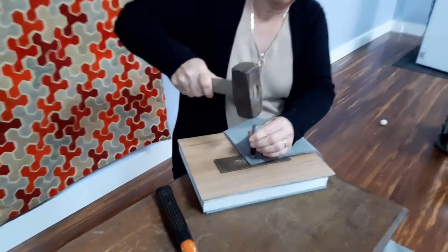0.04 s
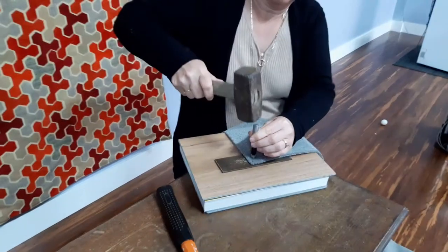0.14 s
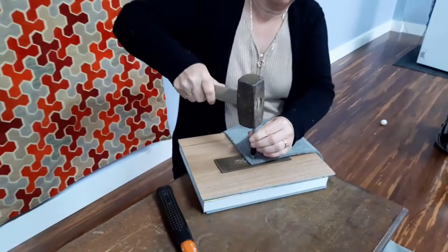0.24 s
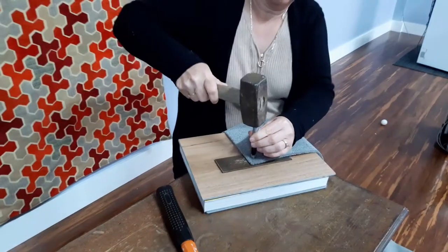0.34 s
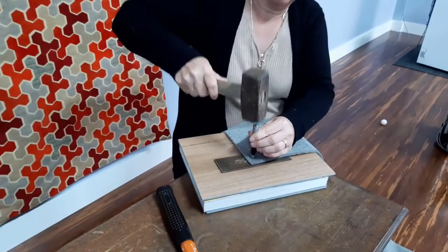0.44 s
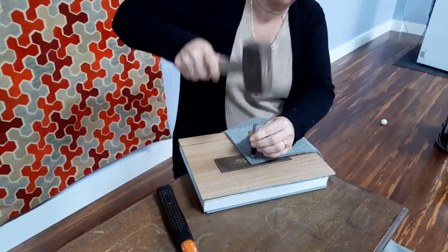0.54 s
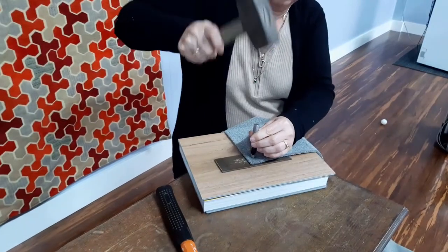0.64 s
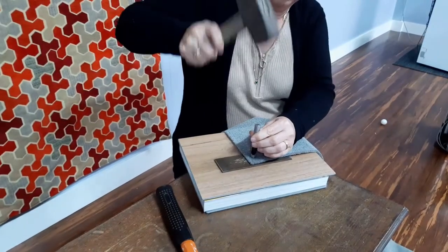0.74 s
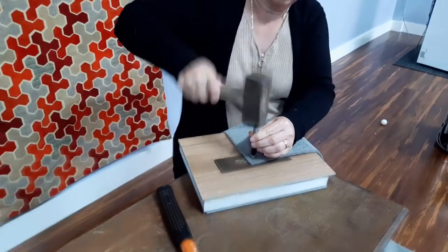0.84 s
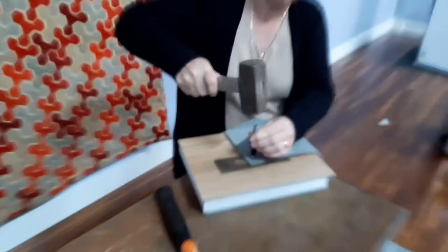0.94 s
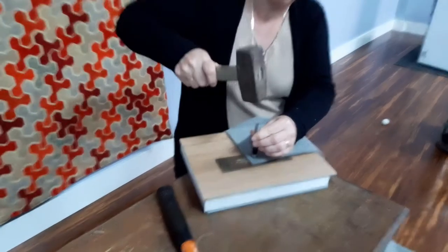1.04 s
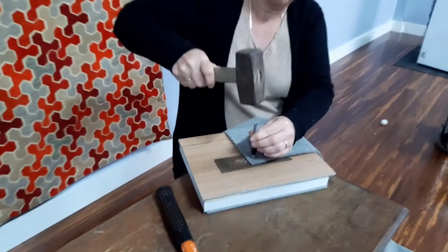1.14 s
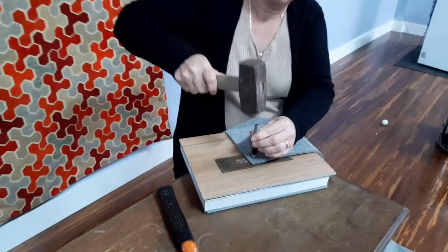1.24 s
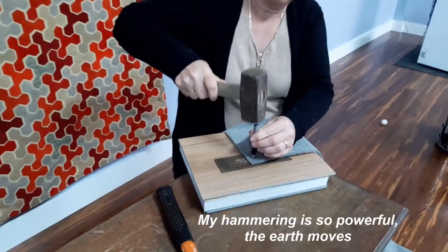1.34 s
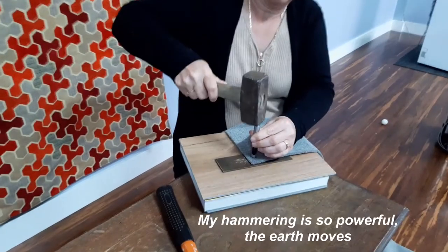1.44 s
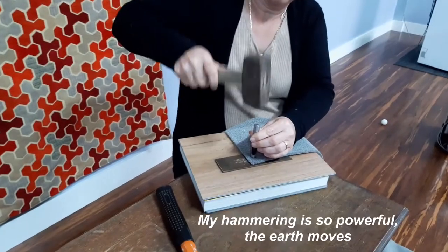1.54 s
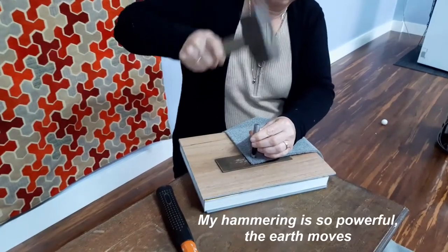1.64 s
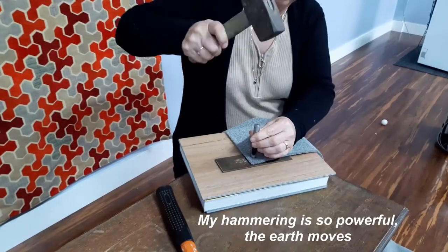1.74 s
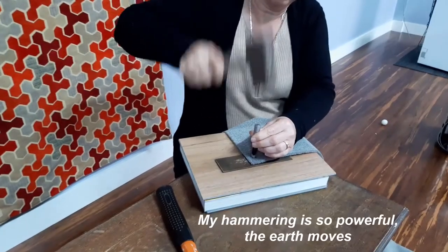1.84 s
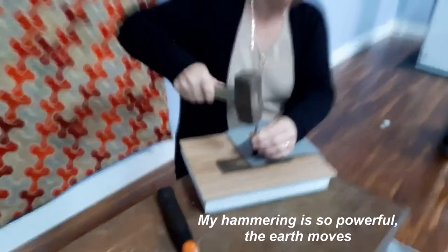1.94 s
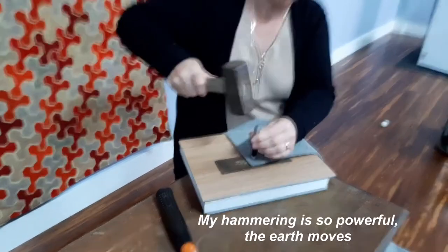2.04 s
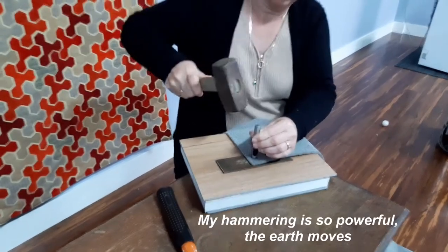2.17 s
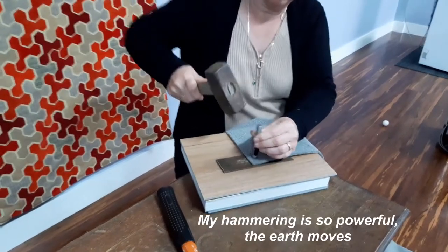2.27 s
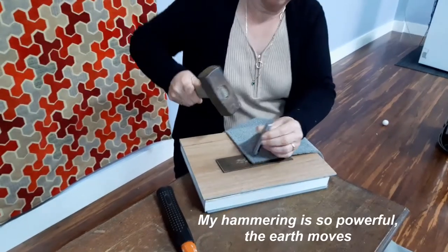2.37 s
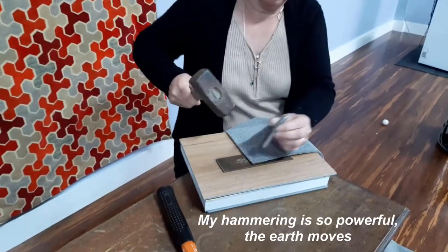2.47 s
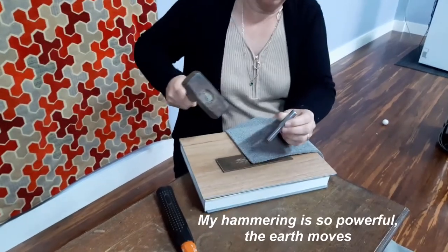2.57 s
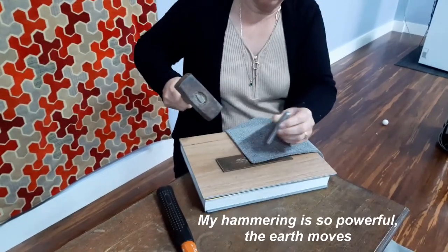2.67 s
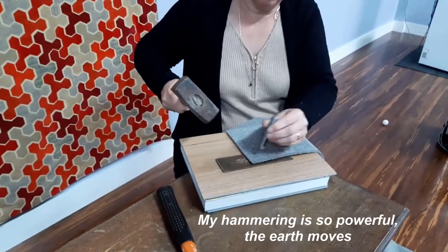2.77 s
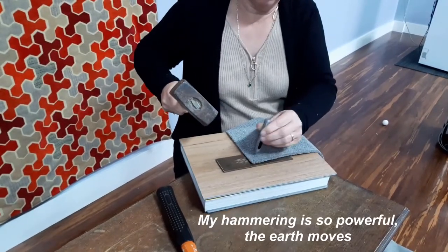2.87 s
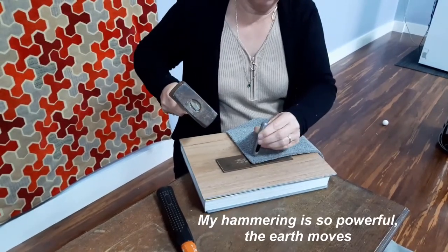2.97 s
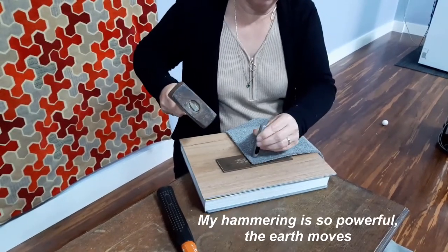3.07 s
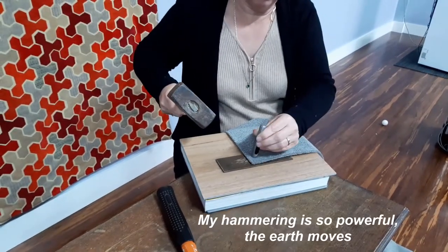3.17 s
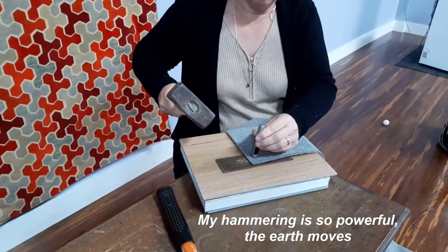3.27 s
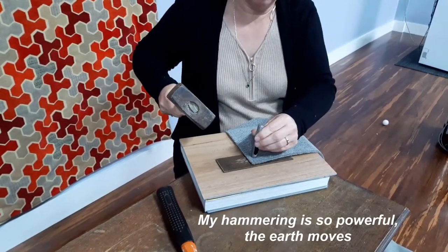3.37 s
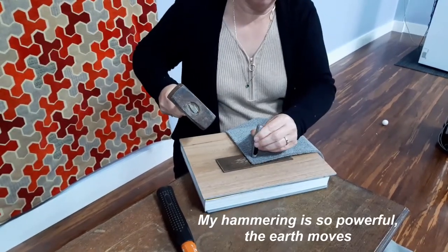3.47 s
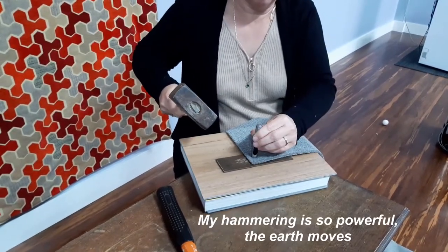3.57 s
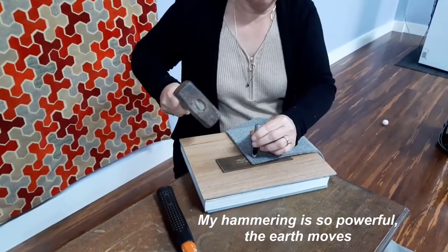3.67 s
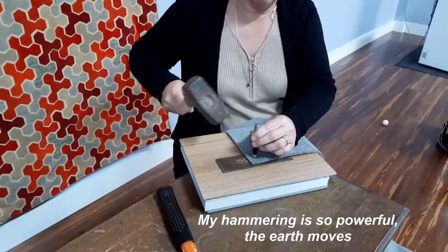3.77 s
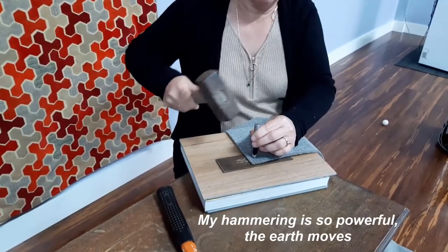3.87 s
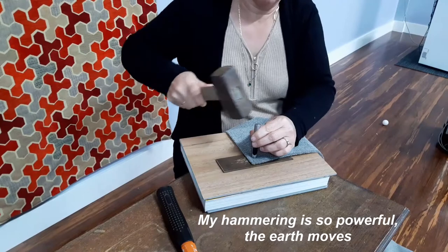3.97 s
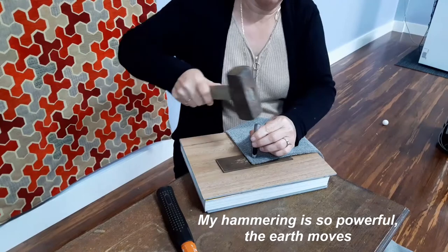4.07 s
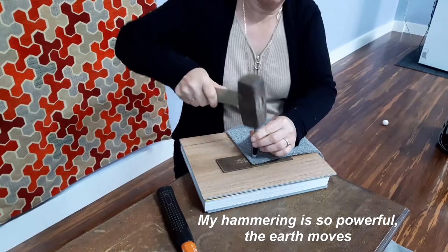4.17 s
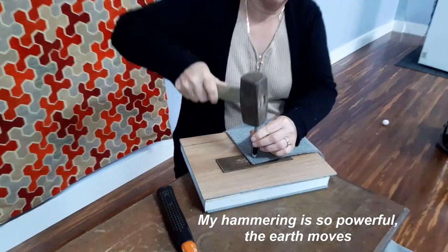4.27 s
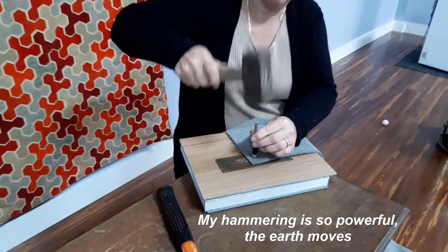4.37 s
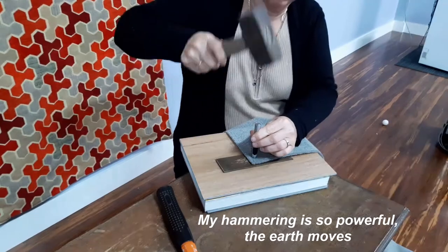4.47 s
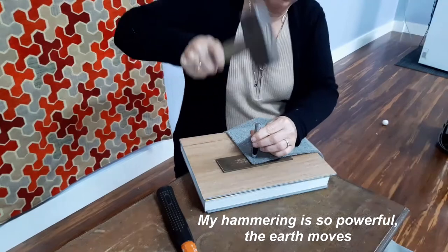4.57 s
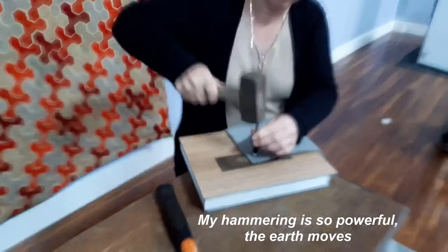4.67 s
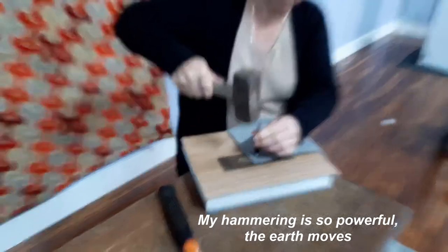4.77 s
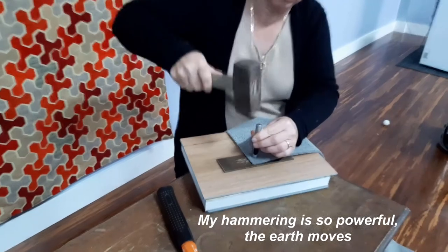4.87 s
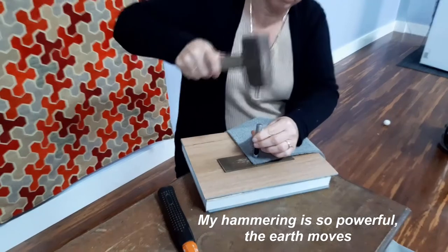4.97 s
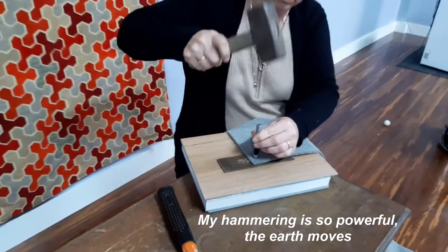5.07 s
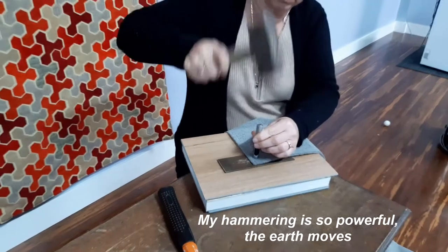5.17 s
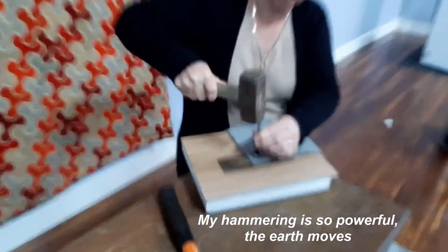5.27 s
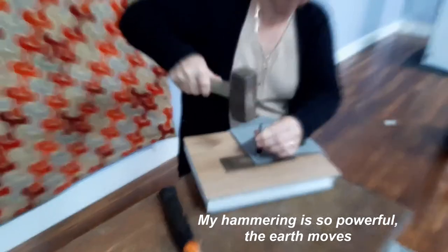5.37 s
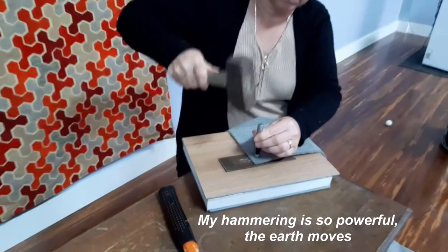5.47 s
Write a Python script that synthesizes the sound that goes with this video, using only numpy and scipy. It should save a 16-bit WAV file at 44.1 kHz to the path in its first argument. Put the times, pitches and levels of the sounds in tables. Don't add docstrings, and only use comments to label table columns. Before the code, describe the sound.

Indoors in a bare room, close stereo microphone: a blow's echo is already fading, then a faint tap, a full cracking blow, a light tap and another blow. The room and thin hammer ring die away into low hum and hiss. After the pause, a firmer tap and two quick full blows.

```python
import sys
import numpy as np
from scipy import signal
from scipy.fft import rfft, irfft, next_fast_len
from scipy.io import wavfile
from scipy.ndimage import uniform_filter1d, map_coordinates

SR = 44100
rng = np.random.default_rng(int(sys.argv[2]) if len(sys.argv) > 2 else 0)


def persist_wave(psi):
    counts = np.round(np.clip(psi, -1, 1) * 32767).astype(np.int16)
    wavfile.write(sys.argv[1], SR, np.atleast_2d(counts).T)


def gain_from_db(level_db):
    decades = np.asarray(level_db, float) / 20
    return 10 ** decades


N = 243431

# (time [s], crack peak [dB], thump [dB], room [dB], brightness [dB per octave])
BLOWS = [
    (-.14, -6, 0, -13.5, -1.5),
    (0.8506, -4, -8.5, -11.5, -0.3),
    (1.8900, -4.5, -6.5, -12, 0.1),
    (4.656, -5, -8.5, -11.5, 0.2),
    (5.2413, -5, -9, -12, -0.04),
]
# (time [s], crack peak [dB], thump [dB], room [dB], brightness [dB per octave])
TAPS = [
    (.2530, -30.5, -20.5, -37, 1.5),
    (1.4, -27, -16.5, -33.5, 2),
    (4.189, -16, -4.5, -18.5, 1.5),
]
# (frequency [Hz], left-right likeness [-1 to 1])
NEAR_LIKENESS = [(60, 0.38), (130, -0.38), (290, 1), (640, -0.036), (1410, 0.36), (3100, 0.21),
                 (6820, 0.08), (15000, -0.073)]


def unit(x):
    return x / np.sqrt(np.mean(x ** 2) + 1e-20)


def along(points, hz):
    f, v = np.transpose(points)
    return np.interp(np.log(hz + 1), np.log(f + 1), v)


def wobble(rate, size):
    knots = rng.standard_normal(int(size * rate / SR) + 4)
    return map_coordinates(knots, [np.arange(size) * rate / SR])


def half_angle(likeness, hz):
    return np.arccos(np.clip(along(likeness, hz), -1, 1)) / 2


def rush(spectrum, likeness, size, fade=lambda hz, t: 0 * t):
    # (frequency [Hz], left minus right [dB])
    lean_points = [(60, 0.5), (110, 0), (200, 0.5), (380, 0.5), (700, 0.5), (1290, 1), (2380, 0.5),
                   (4400, -0.5), (8120, 0), (15000, 2.5)]
    hz, t, z = signal.stft(rng.standard_normal((2, size)), SR, nperseg=2048)
    turn = half_angle(likeness, hz)[:, None]
    common, apart = z[0] * np.cos(turn), z[1] * np.sin(turn)
    pair = np.array([common + apart, common - apart])
    colour = unit(gain_from_db(along(spectrum, hz)))[:, None]
    lean = gain_from_db(np.multiply.outer([.5, -.5], along(lean_points, hz)))[..., None]
    shaped = pair * colour * lean * gain_from_db(fade(hz[:, None], t))
    return signal.istft(shaped, SR, nperseg=2048)[1][:, :size]


def since_contact():
    t = np.arange(N) / SR
    times = np.sort([row[0] for row in BLOWS + TAPS])
    last = np.searchsorted(times, t) - 1
    return last, t - times[last]


def hiss():
    hiss_db, climb_db_per_s, hold_s = -92, 6, 1.5
    t = np.arange(N) / SR
    times = np.array([row[0] for row in BLOWS])
    since = t - times[np.searchsorted(times, t) - 1]
    level_db = hiss_db + climb_db_per_s * np.maximum(since - hold_s, 0)
    return gain_from_db(level_db) * rng.standard_normal((2, N))


def hum():
    # (frequency [Hz], density [dB per Hz])
    rumble_colour = [(15, -39.5), (25, -9), (89, -4.5), (223, -8), (301, -2), (405, -12), (936, -17.5),
                     (1400, -39.5), (2480, -37.5), (3160, -48), (3920, -36.5), (4870, -56), (16000, -47.5)]
    # (frequency [Hz], left-right likeness [-1 to 1])
    rumble_likeness = [(60, 1), (240, 0.36), (950, 0.6), (3770, -0.35), (15000, -0.05)]
    # (frequency [Hz], level [dB rms])
    whines = [(2460, -91.5), (2509, -88.5), (2902, -101), (4032, -92.5)]
    ducked_db, hold_s, recover_db_per_s = -66.5, .85, 10
    t = np.arange(N) / SR
    whine = np.zeros(N)
    for hz, db in whines:
        level = gain_from_db(db + 60.5 + 1.2 * wobble(6, N))
        whine += level * np.sin(2 * np.pi * hz * t + 0.89 * wobble(20, N))
    rumble = rush(rumble_colour, rumble_likeness, N) * gain_from_db(1.7 * wobble(8.0, N))
    since = since_contact()[1]
    gain = gain_from_db(ducked_db + recover_db_per_s * np.maximum(since - hold_s, 0))
    return gain * (rumble + whine)


def desk():
    # (frequency [Hz], level relative to the room [dB], decay t60 [s])
    hollow_modes = [(230.8, -20.5, 1.9), (277, -21.5, 1.7), (565, -30.5, 1.0)]
    t = np.arange(N) / SR
    out = np.zeros(N)
    for start_s, _, _, room_db, _ in BLOWS:
        since = np.maximum(t - start_s, 0)
        build_up = 1 - np.exp(-since / 0.067)
        for hz, db, t60 in hollow_modes:
            level_db = room_db + 11 + db + rng.normal(0, 1.3) + 0.53 * wobble(13, N)
            decay_db = 60 * since / t60 + 7 * since ** 2
            tone = np.sin(2 * np.pi * hz * since + 1.4 * wobble(9.8, N))
            out += gain_from_db(level_db - decay_db) * build_up * tone
    return out


def head():
    # (frequency [Hz], level [dB])
    head_modes = [(10650, 1.5), (10045, -16)]
    # (start [dB], twin share [0-1], first beat crest after contact [s], lower mode [dB])
    rings = [
        (-57, .5, .31, 3),
        (-65, 0.8, .11, 2),
        (-51, .45, .28, -6),
        (-65, 0.6, 0.16, -6.5),
        (-48, .25, .36, -19.5),
        (-68, .5, .22, -15),
        (-52, 0.2, 0.28, -12),
        (-50, .5, 0.12, -10),
    ]
    twin_hz, t60_s, rise_s = 5.5, 2, 0.046
    lean_start_db, lean_db_per_s = 3, 24
    grip_db_per_s2 = 23.5
    t = np.arange(N) / SR
    drift = np.array([wobble(3.7, N), wobble(4.6, N)])
    last, since = since_contact()
    start_db, share, crest, lower_db = np.array(rings)[last].T
    upper, lower = (gain_from_db(db) * np.exp(1j * (2 * np.pi * hz * t + 0.47 * drift)) for hz, db in head_modes)
    beat = 1 + np.clip(share, 0, 1) * np.exp(2j * np.pi * twin_hz * (since - crest))
    lean_db = np.multiply.outer([.5, -.5], lean_start_db + lean_db_per_s * since)
    level_db = start_db - 60 * since / t60_s - grip_db_per_s2 * since ** 2 + lean_db
    build_up = 1 - np.exp(-since / rise_s)
    return gain_from_db(level_db) * build_up * (beat * upper + gain_from_db(lower_db) * lower).imag


def ringing(modes, t, spread_db):
    out = np.zeros((2, len(t)))
    for hz, db, t60 in modes:
        lag = half_angle(NEAR_LIKENESS, hz) * rng.choice([-1, 1]) * np.array([[1], [-1]])
        level_db = db + rng.normal(0, spread_db, (2, 1)) - 60 * t / t60
        out += gain_from_db(level_db) * np.sin(2 * np.pi * hz * t + lag)
    return out


def contact(row, modes, crack_colour, room_colour, peaks, crack_t60, lasting, swell, length):
    # (delay [s], level [dB])
    walls = [(.0019, 3), (.0112, -7), (.0134, -17), (0.022, -29.5)]
    # (frequency [Hz], decay t60 [s])
    room_t60 = [(60, 2.45), (250, 1.296), (700, 1.71), (2000, 1.45), (5000, 1.072), (9000, 0.74),
                (15000, 0.57)]
    # (frequency [Hz], left-right likeness [-1 to 1])
    room_likeness = [(60, 0.81), (130, 0.89), (290, 0.93), (640, 0.36), (1410, -0.12), (3100, -0.027),
                     (6820, -0.0), (15000, -0.23)]
    _, crack_db, thump_db, room_db, tilt_db = row
    t = np.arange(length) / SR
    near = t[:SR // 4]

    def bright(hz, s):
        return tilt_db * np.log2(1 + hz / 2000) + 0 * s

    def tail_fade(hz, s):
        humps = sum(db / (1 + (2 * (hz - centre) / width) ** 2) for centre, width, db in peaks)
        return bright(hz, s) + humps - 60 * s / (lasting * along(room_t60, hz))

    snap = gain_from_db(crack_db - 60 * near / crack_t60) * (1 - np.exp(-near / 0.00028))
    splinters = rush(crack_colour, NEAR_LIKENESS, len(near), bright)
    damping = np.exp(-(near / 0.12) ** 2)
    press = (1 - np.exp(-near / 0.0012)) * damping
    thump = -gain_from_db(thump_db) * ringing(modes, near, spread_db=2.4) * press
    direct = np.zeros((2, length))
    direct[:, :len(near)] = snap * splinters + thump
    for k, (delay, db) in enumerate(walls):
        scattered = np.roll(splinters, -(k + 1) * SR // 25, axis=1)
        direct[:, round(delay * SR):][:, :len(near)] += gain_from_db(db) * (snap * scattered + 0.14 * thump)

    tail = rush(room_colour, room_likeness, length, tail_fade)
    rise = 0.17 + 0.69 * np.sin(np.pi / 2 * np.clip(t / swell, 0, 1)) ** 2
    lumps = gain_from_db(1.3 * wobble(25, length))
    onset = 1 - np.exp(-t / 0.0016)
    room = gain_from_db(room_db - 7.3 * t ** 2) * rise * lumps * tail * onset
    return np.array([direct, room])


def dropout(room):
    # (frequency [Hz], level relative to the whole sound [dB])
    treble_floor = [(5000, -91.5), (9000, -62.5), (10000, -58), (16000, -54.5)]
    hz, _, z = signal.stft(room, SR, nperseg=1024)
    power = uniform_filter1d(np.abs(z) ** 2, size=16, axis=1)
    power = np.abs(uniform_filter1d(power, size=3, axis=2)) + 1e-20
    patches = rng.standard_normal((33, z.shape[2] // 4 + 1))
    whim_db = 2.5 * np.kron(patches, np.ones((16, 4)))[:len(hz), :z.shape[2]]
    limit = power.sum(axis=1, keepdims=True) * gain_from_db(along(treble_floor, hz)[:, None] + whim_db) ** 2
    return signal.istft(z / (1 + (limit / power) ** 3), SR, nperseg=1024)[1][:, :N]


def hammer():
    # (frequency [Hz], level [dB], decay t60 [s])
    blow_modes = [(298.6, 1.5, 0.1), (216, -2, 0.1), (545, -8, 0.1), (109.1, -16, 0.98), (760, -3, 0.023),
                  (2020, -20.5, .02)]
    tap_modes = [(293, 2, 0.14), (215, -11.5, 0.12), (388.4, -1, 0.074), (482, -3, 0.049), (817, -6, 0.066),
                 (3575, -17, 0.078), (4500, -25, 0.037), (8250, -6, 0.0076)]
    # (frequency [Hz], density [dB per Hz])
    blow_crack = [(350, -30.5), (600, 1), (1960, -5.5), (2630, -11.5), (4600, -13), (6520, -11.5),
                  (6900, -16), (11400, -17.5), (15100, -17.5), (16800, -24)]
    tap_crack = [(350, -32), (600, -11), (1080, 2), (1810, -21.5), (3580, 1.5), (4730, -11), (5290, -17),
                 (6340, -16.5), (8500, -17), (13700, -32), (15100, -36), (16800, -51)]
    # (frequency [Hz], density [dB per Hz])
    blow_room = [(18, -69), (30, -49), (101, -28.5), (158, -17.5), (217, -4), (378, -13), (480, -9.5),
                 (533, -15.5), (732, -10), (1660, -22.5), (2050, -23.5), (2670, -26), (6720, -30.5),
                 (15200, -36.5), (16500, -81)]
    tap_room = [(18, -61.5), (30, -29), (176, -14.5), (268, -2.5), (455, -10.5), (493, -9), (904, -15),
                (1700, -31.5), (4180, -22.5), (5030, -34.5), (12700, -47), (15200, -54.5), (16500, -102)]
    # (frequency [Hz], width [Hz], level [dB])
    blow_peaks = [(110, 20, 3.5), (210, 40, 3), (291, 64, 7), (372, 8.2, 3.5), (556, 55, 9.5),
                  (716, 11, -4.5), (2070, 49, 8), (5660, 510, 6.5), (6900, 600, 7)]
    tap_peaks = [(290, 25, 6.5), (3400, 890, 5.5), (8550, 630, 5)]
    lead = 8820
    length = 70000
    out = np.zeros((2, 2, lead + N + length))

    def place(row, sound):
        start = lead + round(row[0] * SR)
        out[..., start:start + length] += sound

    for row in BLOWS:
        place(row, contact(row, blow_modes, blow_crack, blow_room, blow_peaks,
                           crack_t60=0.0062, lasting=1.018, swell=0.078, length=length))
    for row in TAPS:
        place(row, contact(row, tap_modes, tap_crack, tap_room, tap_peaks,
                           crack_t60=0.022, lasting=0.91, swell=0.056, length=length))
    direct, room = out[..., lead:lead + N + 2048]
    return direct[:, :N] + dropout(room)


def scene():
    return hiss() + hum() + desk() + head() + hammer()


def top_cut(x):
    return signal.sosfilt(signal.butter(12, 16990, fs=SR, output="sos"), x)


def record(dry):
    # (frequency [Hz], level [dB])
    band_top = [(15700, 0), (16300, -15.5), (17200, -51.5)]
    bass_hz = 42
    mic = signal.lfilter(*signal.butter(2, bass_hz / (SR / 2), "high"), dry)
    soft = mic / (1 + np.abs(mic / 1.1) ** 4) ** (1 / 4)
    m = next_fast_len(N + SR // 4)
    response = gain_from_db(along(band_top, np.fft.rfftfreq(m, 1 / SR)))
    limited = irfft(rfft(soft, m) * response, m)[:, :N]
    return top_cut(limited)


dry = scene()
out = record(dry)
persist_wave(out)
```